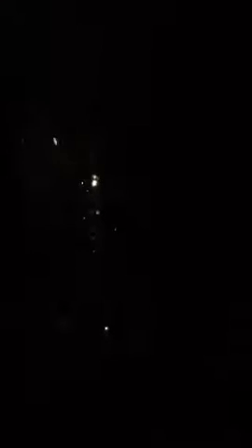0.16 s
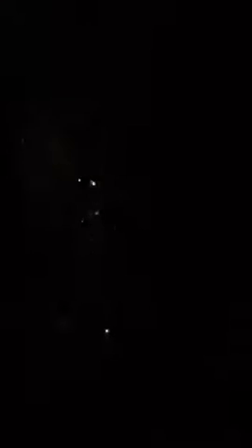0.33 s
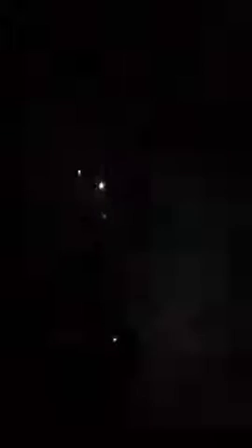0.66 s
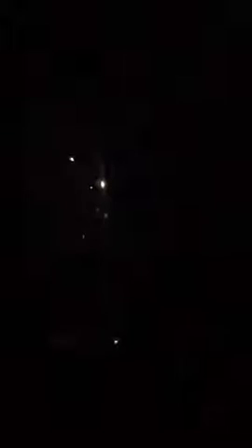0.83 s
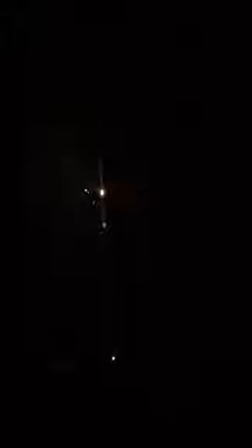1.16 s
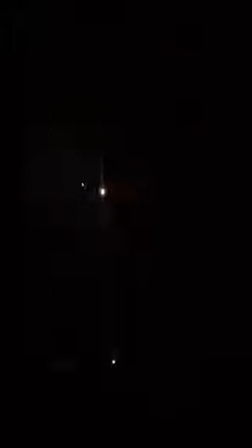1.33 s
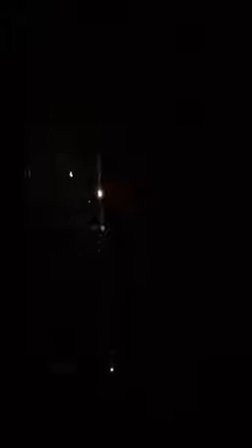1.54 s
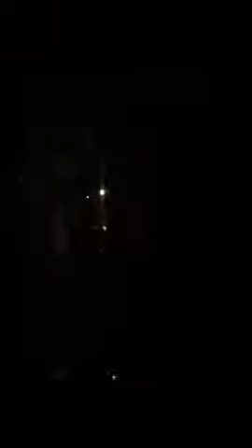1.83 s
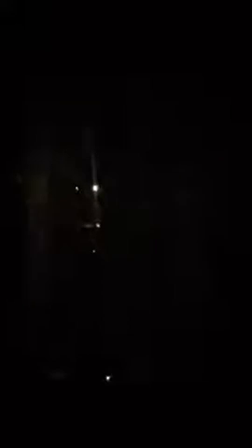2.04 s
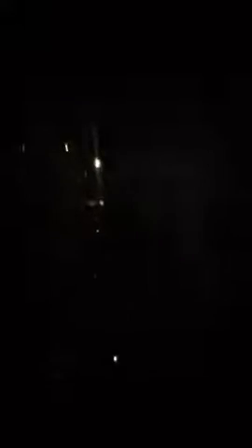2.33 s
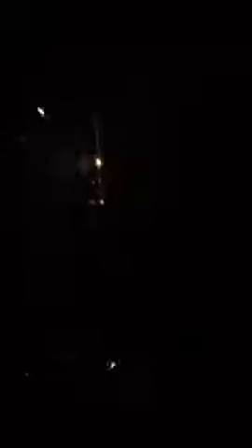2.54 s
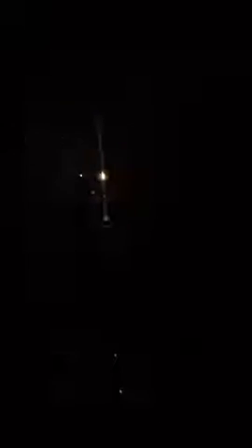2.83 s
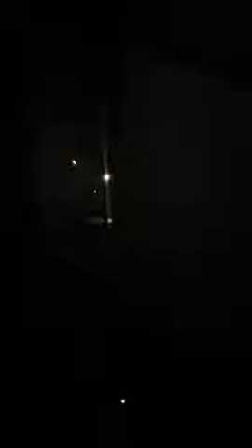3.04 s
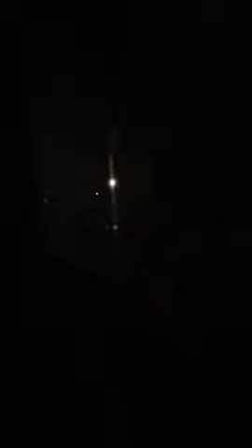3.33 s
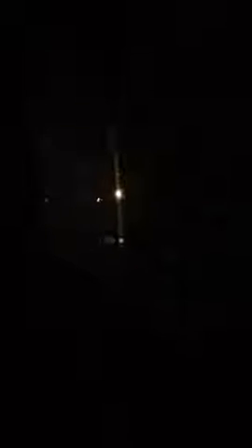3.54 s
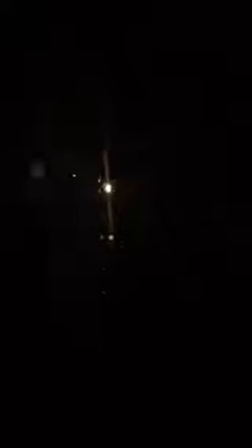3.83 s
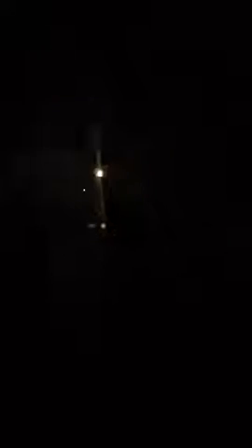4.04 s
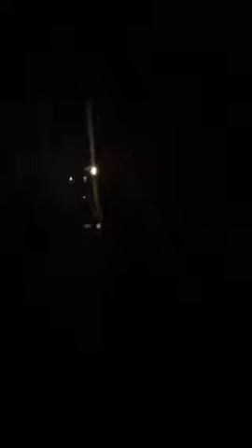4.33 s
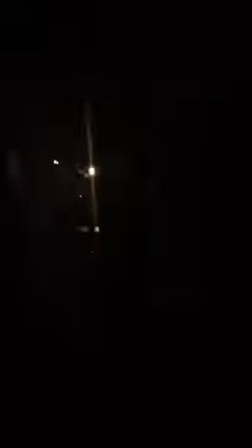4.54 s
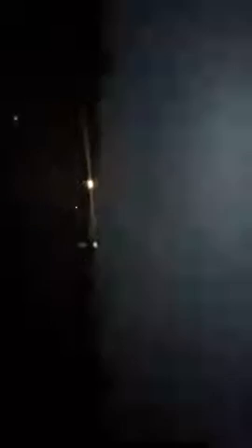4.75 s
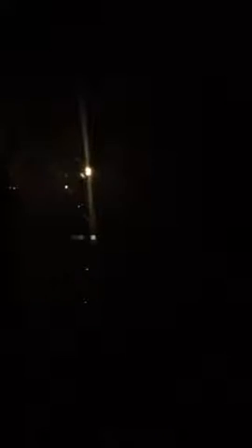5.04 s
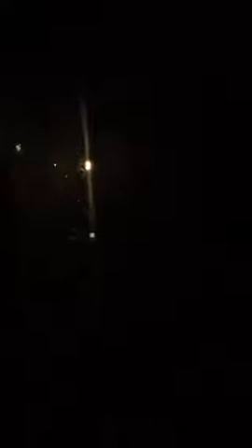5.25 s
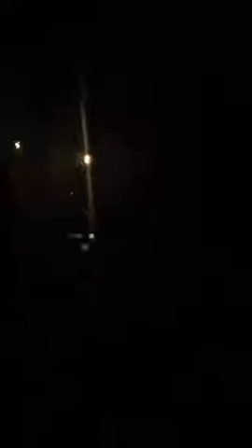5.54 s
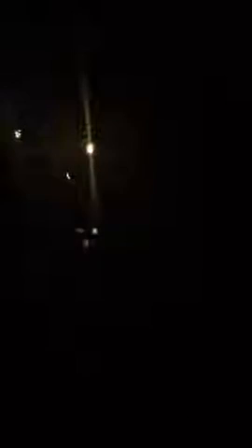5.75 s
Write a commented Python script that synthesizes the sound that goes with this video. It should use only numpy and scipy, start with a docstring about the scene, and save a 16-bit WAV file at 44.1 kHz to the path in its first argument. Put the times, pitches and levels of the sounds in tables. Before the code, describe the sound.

Heavy rain falls on a moving car for about six seconds, heard from inside the cabin, an arm's length from the roof and windscreen. A deep, fluttering rumble of road and buffeting wind runs throughout, with a low roar of wet tyres and a softer rush of air. A low boom colours the first second. Dull road bumps come irregularly, several in the first 1.2 seconds, the strongest around 2.3 to 2.5, and more near 3.8 and 4.8. Dense rain drums continuously on the roof panels, while fine drops crackle and tick on the windscreen. Single fat drops splash sharply on the glass close ahead, most clearly at about 1.1, 1.3, 1.6, 2.4 and 4.0 seconds. Gusts lift the rain and tyre roar slightly around 2.3 and 2.9 seconds, but the overall level stays steady to the end.

```python
"""Driving through night rain

One microphone inside the car, an arm's length from roof and windscreen. Wind and road shake the body
into a deep rumble, with bumps and a boom in the cabin; wet tyres roar below and air rushes past.
Dense rain rings the panels overhead, and single drops tick and splash on the glass ahead."""
import sys
import numpy as np
from scipy import signal
from scipy.fft import rfft, irfft, next_fast_len
from scipy.io import wavfile
from scipy.ndimage import uniform_filter1d

SR = 44100
rng = np.random.default_rng(int(sys.argv[2]) if len(sys.argv) > 2 else 0)


def put_to_file(sound):
    """Save the sound as 16-bit audio at rate SR, in the file named by the first command-line argument."""
    columns = np.atleast_2d(sound).T  # one column per channel
    safe = np.clip(columns, -1, 1)
    whole_steps = np.round(safe * 32767)
    wavfile.write(sys.argv[1], SR, whole_steps.astype(np.int16))


N = 259749

# The windscreen struck by a single drop. Each row: frequency in Hz, gain in dB.
GLASS_TICK = [(1200, -13), (2800, -7), (4000, -1), (5500, 3), (7300, 2), (8300, -6)]


def from_db(db):
    """Decibels to gain."""
    return 10 ** (np.asarray(db) / 20)


def unit_power(x):
    """Scale to a mean power of 1."""
    return x / np.sqrt(np.mean(x ** 2) + 1e-20)


def steady(x, span_s):
    """Hold the power near 1 over each stretch of span_s; faster flutter stays."""
    return x / np.sqrt(uniform_filter1d(x * x, max(int(span_s * SR), 2)) + 1e-20)


def curve(rows):
    """Join (seconds, value) points with straight lines, sample by sample."""
    return np.interp(np.arange(N) / SR, *np.transpose(rows))


def flurries(per_s):
    """A slow random swing of spread 1."""
    knots = rng.standard_normal(1000)
    return unit_power(np.interp(np.arange(N) / SR * per_s, np.arange(len(knots)), knots))


def coloured(x, spectrum):
    """Causal (minimum-phase) filter that follows a table of (Hz, dB)."""
    size = next_fast_len(N + SR // 2, True) * 2
    hz, gain_db = np.transpose(spectrum)
    bin_hz = np.maximum(np.arange(size // 2 + 1) * SR / size, 1)
    gain = from_db(np.interp(np.log(bin_hz), np.log(hz), gain_db))
    cepstrum = irfft(np.log(gain))
    cepstrum[1:size // 2] *= 2  # fold onto positive time: nothing rings before the hit
    cepstrum[size // 2 + 1:] = 0
    return irfft(rfft(x, size) * np.exp(rfft(cepstrum)))[:N]


def resonance(x, hz, width_hz):
    """One ringing mode: a two-pole band-pass with gain 1 at its peak."""
    radius = np.exp(-np.pi * width_hz / SR)
    feedforward = np.array([1, 0, -1]) * (1 - radius ** 2) / 2
    feedback = [1, -2 * radius * np.cos(2 * np.pi * hz / SR), radius ** 2]
    return signal.lfilter(feedforward, feedback, x + 1e-18)


def turbulence(spectrum, span_s):
    """Steady random pressure of a given colour."""
    return steady(coloured(rng.standard_normal(N), spectrum), span_s)


def shower(per_s, spread_db, cap_spreads):
    """Drop impacts at random moments: many small, a few large."""
    sizes = from_db(spread_db * np.minimum(rng.exponential(1, N), cap_spreads))
    lands = rng.random(N) < per_s / SR
    return lands * sizes * rng.choice([-1, 1], N)


def splats(hits, splash_db, splash_t60_s):
    """Each impact is a sharp click followed by the fine spray of the drop breaking up."""
    power_decay = 1e-6 ** (np.arange(SR // 10) / SR / splash_t60_s)
    spray_power = signal.fftconvolve(hits ** 2, power_decay / power_decay.sum())[:N]
    spray = np.sqrt(np.maximum(spray_power, 0)) * rng.standard_normal(N)
    return hits + from_db(splash_db) * spray


def wind_buffet():
    """Wind shakes the body around the microphone, at the very bottom of the bass."""
    # Strength of the buffeting. Each row: time in seconds, level in dB.
    strength = [(0, -32.5), (.6, -38), (.8, -33.5), (1.3, -35.5), (1.62, -31), (1.9, -39), (2.15, -32.5),
                (2.85, -35.5), (3.6, -32.5), (4.3, -32.5), (4.88, -38), (5.1, -30), (5.5, -35.5),
                (5.89, -28)]
    # Its colour. Each row: frequency in Hz, relative level in dB.
    colour = [(12, -10), (22, -0.5), (31, -2), (43, 9.5), (60, 11), (75, -13), (120, -46.5)]
    return from_db(curve(strength)) * turbulence(colour, span_s=0.26)


def road_rumble():
    """Rumble from under the floor follows the coarseness of the road, flutters and dips briefly."""
    # Coarseness of the road. Each row: time in seconds, level in dB.
    coarseness = [(0, -27.5), (1.0, -26.5), (1.9, -28), (2.35, -26), (3.3, -25.6), (3.85, -26),
                  (4.2, -26.5), (4.7, -27), (5.89, -27)]
    # Brief dips. Each row: middle in seconds, half length in seconds, depth in dB (negative swells).
    lulls = [(.285, 0.027, 10), (0.504, 0.033, 4), (0.684, 0.035, 7), (.9, 0.027, 14), (2.67, 0.082, 8.5),
             (2.943, 0.016, 12), (4.59, .015, -2), (4.9, .04, 4)]
    # Colour of the rumble. Each row: frequency in Hz, relative level in dB.
    colour = [(40, -26), (60, -9), (78, 0), (95, 0), (135, -2.5), (160, -3.5), (190, -5.5), (235, -24.5),
              (400, -58.5)]
    t = np.arange(N) / SR
    dips_db = sum(db * np.exp(-((t - middle_s) / half_s) ** 2) for middle_s, half_s, db in lulls)
    flutter_db = 1.24 * flurries(per_s=14)
    return from_db(curve(coarseness) + flutter_db - dips_db) * turbulence(colour, span_s=0.091)


def jolts(rise_s):
    """Each bump swells for about a cycle and is damped by the suspension."""
    # Bumps in the road. Each row: start in seconds, peak level in dB, pitch in Hz.
    bumps = [(0.019, -19.5, 92.7), (0.227, -23, 138), (0.344, -17.5, 111), (.422, -25, 106),
             (0.79, -17.5, 93), (1.181, -18, 118), (1.635, -21, 118), (2.14, -23.5, 80.5),
             (2.311, -16, 107), (2.455, -14, 82.4), (3.665, -18, 123), (3.884, -16.5, 115),
             (4.544, -22.5, 139), (4.75, -18.5, 123.4), (4.873, -16.5, 129)]
    thuds = np.zeros(N)
    for start_s, peak_db, hz in bumps:
        age = np.maximum(np.arange(N) / SR - start_s, 0)
        envelope = age / rise_s * np.exp(1 - age / rise_s)
        thuds += from_db(peak_db) * envelope * np.sin(2 * np.pi * hz * age)
    return thuds


def cabin_boom(hz, width_hz):
    """Road noise feeds one narrow air mode of the cabin, mostly in the first second."""
    # Strength of the boom. Each row: time in seconds, level in dB.
    strength = [(0, -24), (0.2, -50), (.45, -35.5), (.8, -29), (1.0, -53), (1.4, -57)]
    feed = resonance(rng.standard_normal(N), hz, width_hz)
    return from_db(curve(strength)) * steady(resonance(feed, hz, width_hz), span_s=0.6)


def tyre_roar(gust_db):
    """Wet tyres, heard through the body, roar louder as gusts drive standing water at them."""
    # Colour of the roar. Each row: frequency in Hz, relative level in dB.
    colour = [(140, -18.5), (200, 1.5), (235, -0.5), (290, -0.5), (380, -4.5), (480, -7), (620, -14),
              (1000, -42.5)]
    return from_db(-35 + 2.3 * gust_db) * turbulence(colour, span_s=0.22)


def air_rush(gust_db):
    """Air rushes over the outside of the car and lifts a little in each gust."""
    # Colour of the rush. Each row: frequency in Hz, relative level in dB.
    colour = [(300, -9.5), (560, 0), (760, -2), (1050, -3.5), (1300, -5), (1750, -5), (2000, -7.5),
              (2400, -12), (3200, -13), (3700, -17), (5000, -22), (8000, -45.5)]
    return from_db(-41 + 0.64 * gust_db) * turbulence(colour, span_s=0.18)


def roof_rain(gust_db):
    """Dense rain rings the panels, each drop in its own mix of modes; gusts throw the drops harder."""
    # Modes of the roof and windows. Each row: frequency in Hz, width in Hz, relative gain in dB.
    modes = [(278, 62, -1.5), (365.4, 30, 3.5), (420, 60, 2.5), (567.6, 14, -0.5), (632, 30, -4),
             (683, 33, 0), (837, 40, -2), (962, 69, -6.5), (1190, 71, -8.5), (1422, 51, -1.5),
             (1536, 100, -10.5), (1715, 68, -8.5), (1844, 70, -13), (2130, 46, -13), (2540, 150, -17),
             (2980, 250, -18)]
    hits = shower(per_s=3900, spread_db=2.0, cap_spreads=3.9)
    ringing = sum(from_db(db) * resonance(hits * rng.standard_normal(N), hz, width_hz)
                  for hz, width_hz, db in modes)
    return from_db(-40 + gust_db) * steady(ringing, span_s=0.49)


def windscreen_patter(gust_db):
    """Small drops crackle on the glass, more as the rain thickens, over the sizzle of the finest."""
    # The windscreen under small drops. Each row: frequency in Hz, relative level in dB.
    colour = [(1200, -17), (2800, -2), (4000, 5), (5000, 2), (5800, 5), (7300, 3.5), (7800, -2),
              (8300, -13)]
    rain_db = -52.5 + 0.15 * gust_db
    thickness_db = 3 * (rain_db - np.mean(rain_db)) + 3.8 * flurries(per_s=18)
    hits = shower(per_s=300 * from_db(thickness_db), spread_db=3.5, cap_spreads=2.4)
    crackle = unit_power(splats(hits, splash_db=3.5, splash_t60_s=0.023))
    sizzle = from_db(0.5) * rng.standard_normal(N)
    return from_db(rain_db) * unit_power(coloured(crackle + sizzle, colour))


def windscreen_taps():
    """Small hard drops strike the glass with one dry click each and no splash."""
    hits = shower(per_s=24, spread_db=3, cap_spreads=2.2)
    return from_db(-27.5) * coloured(hits, GLASS_TICK)


def fat_drops():
    """Single heavy drops burst on the glass just ahead of the microphone, clear of the patter."""
    # Heavy drops. Each row: start in seconds, click level in dB before the glass colours it.
    drops = [(0.1122, -26), (0.609, -20.5), (0.8037, -27), (0.8315, -24), (0.8439, -21), (1.115, -16),
             (1.323, -19), (1.4351, -21), (1.5433, -25), (1.5994, -19), (1.6753, -24), (2.1584, -27),
             (2.4287, -20), (2.477, -23), (2.6873, -25), (2.7502, -24), (2.846, -22), (2.8653, -22),
             (3.3317, -21), (3.6749, -23), (4.005, -18), (4.208, -23), (4.5561, -23), (4.735, -23.5),
             (5.4214, -23), (5.5054, -23), (5.639, -22), (5.8644, -28)]
    hits = np.zeros(N)
    for start_s, level_db in drops:
        hits[int(start_s * SR)] = from_db(level_db)
    return coloured(splats(hits, splash_db=4.5, splash_t60_s=0.082), GLASS_TICK)


def scene():
    """Everything meets at one spot in the cabin; the same gusts drive tyres, air and rain."""
    # Gusts against the car. Each row: time in seconds, dB about the usual strength.
    gusts = [(0, -0.3), (0.299, -0.1), (.6, -0.5), (1.1, -.5), (1.6, 0.25), (2.0, 0.2), (2.3, 1),
             (2.601, -0.7), (2.88, 1), (3.45, 0.3), (4.0, -1), (4.3, .5), (4.701, 0.1), (5.1, -.5),
             (5.5, .4), (5.89, -.3)]
    gust_db = curve(gusts)
    rumble = wind_buffet() + road_rumble() + jolts(rise_s=0.0089) + cabin_boom(hz=95.66, width_hz=5.3)
    rush = tyre_roar(gust_db) + air_rush(gust_db)
    rain = windscreen_patter(gust_db) + windscreen_taps() + fat_drops() + roof_rain(gust_db)
    return (rumble + rush + rain)[None]


def record(dry):
    """The microphone's one channel, with the top cut steeply."""
    stop_hz, stop_db = 8450, 70
    return signal.sosfilt(signal.cheby2(28, stop_db, stop_hz, fs=SR, output="sos"), dry)


dry = scene()
out = record(dry)
put_to_file(out)
```